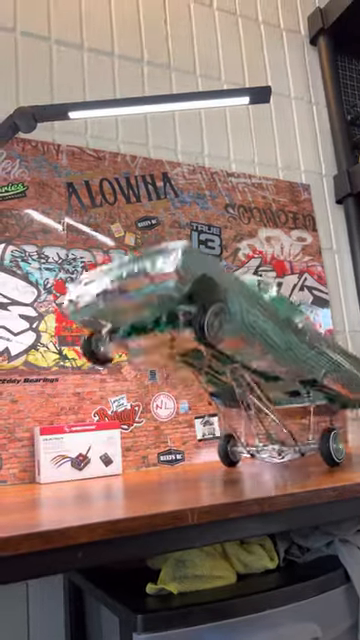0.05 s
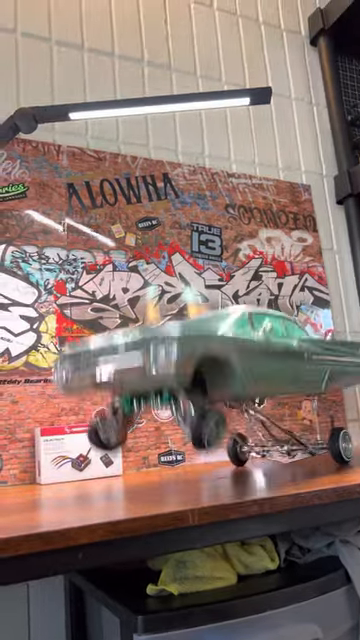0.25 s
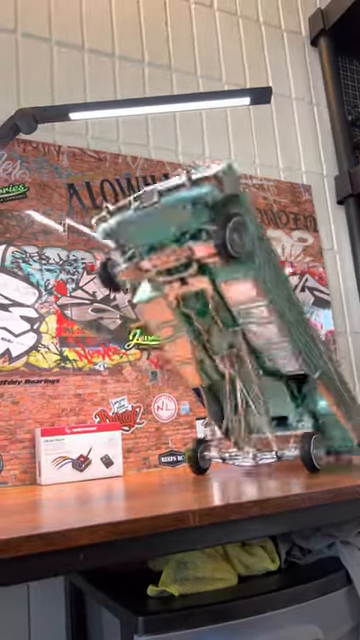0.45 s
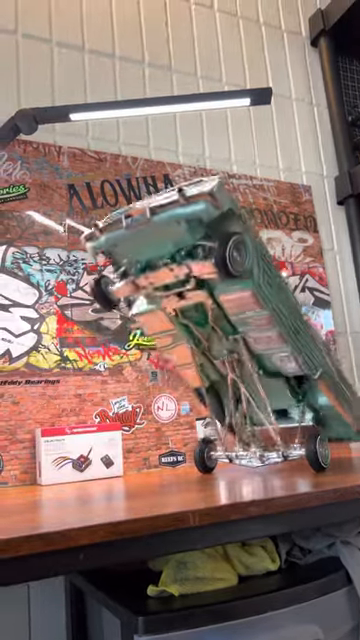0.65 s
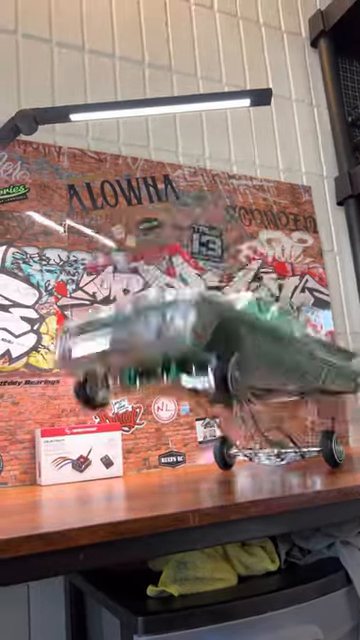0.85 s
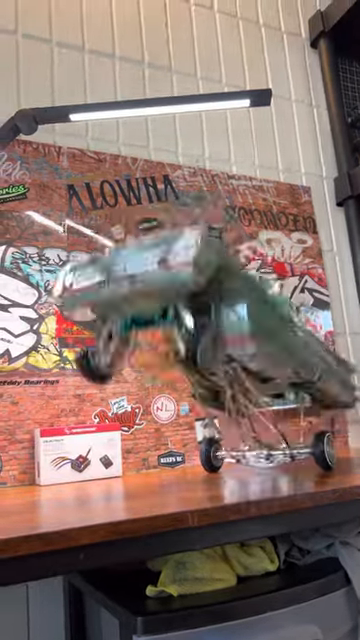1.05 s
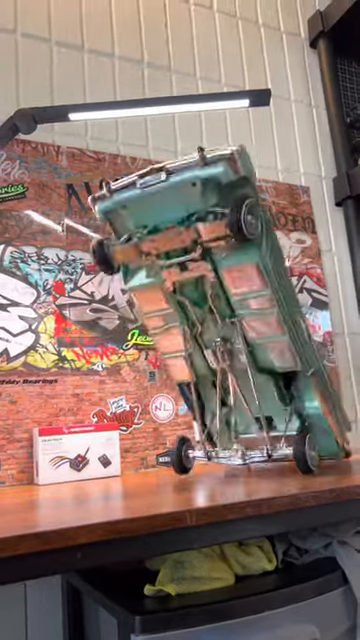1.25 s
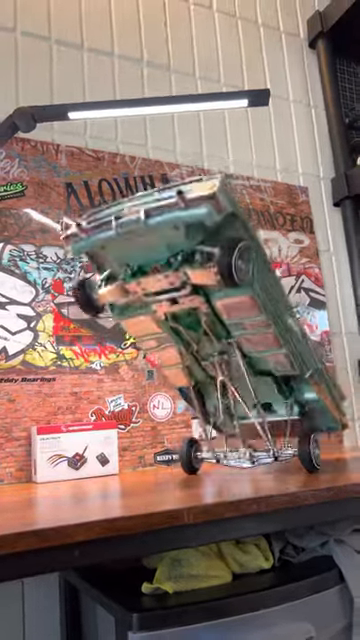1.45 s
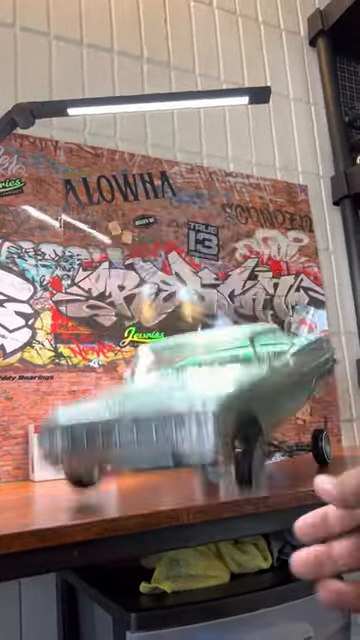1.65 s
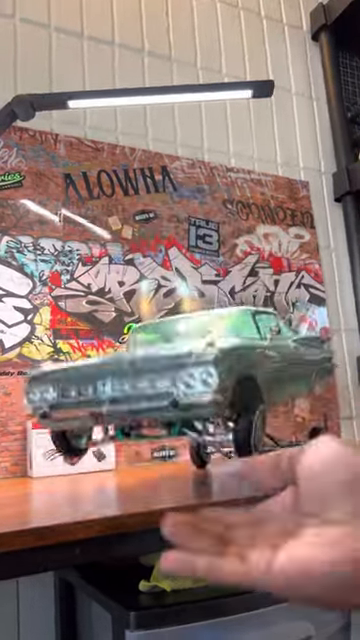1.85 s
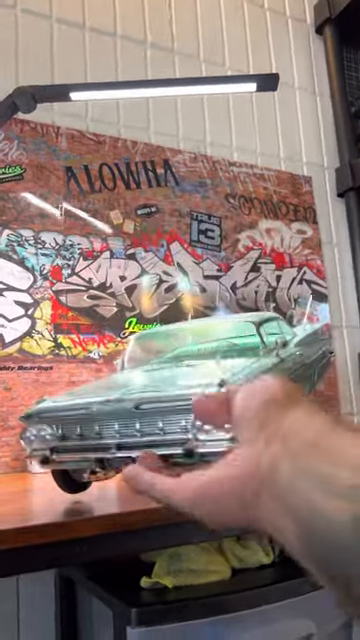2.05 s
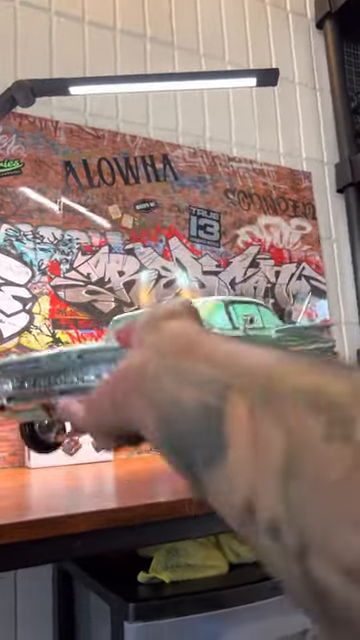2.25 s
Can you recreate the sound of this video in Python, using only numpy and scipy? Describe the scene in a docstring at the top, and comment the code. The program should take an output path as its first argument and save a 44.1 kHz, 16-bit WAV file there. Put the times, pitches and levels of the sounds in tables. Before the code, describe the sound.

Close by in a small, faintly humming room, a toy car thumps and clatters on a wooden bench. Two hops come with short gear rasps and high squeaks, light ticks between them, then a sharp drop and one last bounce.

```python
"""A radio-controlled model car hops on a wooden workbench in a small, humming workshop. First its linkage
creeps with faint ticks. Twice the front tyres land with a boom, the geared lift rasps, throws the nose up and
spins back with a squeak, and the tail clatters on the wood, each impact exciting the modes of shell, chassis
and bench. Then, near 1.7 s, a brief swell of noise leads into a drop with a thud; the car bounces once and
settles. A low handling bump comes last."""
import sys
import numpy as np
from scipy import signal
from scipy.fft import rfft, irfft
from scipy.io import wavfile
from scipy.ndimage import uniform_filter1d

SR = 44100
rng = np.random.default_rng(int(sys.argv[2]) if len(sys.argv) > 2 else 0)


def to_wav(s):
    """Save 16-bit WAV."""
    ch = np.atleast_2d(s).T  # columns
    pcm = np.round(np.clip(ch, -1, 1) * 32767)  # PCM
    wavfile.write(sys.argv[1], SR, pcm.astype(np.int16))


N = 101429
T = np.arange(SR // 2) / SR  # time axis of one event [s]


def amp(db):
    """Amplitude ratio of a level in decibels."""
    return 10 ** (np.asarray(db) / 20)


def unit(x):
    """Normalisation to rms 1."""
    return x / np.sqrt(np.mean(x ** 2) + 1e-20)


def read(points, hz):
    """Interpolation of a table on a logarithmic frequency axis."""
    f, value = np.transpose(points)
    return np.interp(np.log(hz + 1), np.log(f), value)


def add(mix, s, sound):
    """Superposition: a sound joins the mix at time s."""
    part = mix[:, round(s * SR):][:, :sound.shape[-1]]
    part += sound[..., :part.shape[1]]


# Likeness of the left and right channels: (frequency [Hz], coherence [0-1])
COHERENCE = [(120, .99), (300, 1), (600, 0.6), (1500, 0.33), (5000, 0.26), (12000, 0.96)]

def noise(colour, size=len(T)):
    """Random-phase synthesis: partly coherent stereo noise of rms 1, its spectrum colour(hz) in dB."""
    hz = np.fft.rfftfreq(size, 1 / SR)
    mid, side = np.exp(2j * np.pi * rng.random((2, len(hz))))
    coherence = np.clip(read(COHERENCE, hz), 0, 1)
    mid, side = mid * np.sqrt(1 + coherence), side * np.sqrt(1 - coherence)
    return unit(irfft(np.array([mid + side, mid - side]) * amp(colour(hz)), size))


# Spectrum of the air noise: (frequency [Hz], level [dB])
AIR_SPECTRUM = [(25, -29), (45, -3), (80, -7), (200, -5), (330, -11.5), (550, -13), (1000, -23),
                (2400, -26), (4200, -29.5), (5200, -37.5), (7500, -34.5), (16000, -59)]
# Partials of the hum: (frequency [Hz], level [dB])
HUM_PARTIALS = [(70, -47.5), (146, -49)]
# Envelope of air noise and hum together: (time [s], gain [dB])
BACKGROUND_ENVELOPE = [(0, 0.5), (1.63, 1), (2.05, 4), (2.22, -3.5)]

def workshop(air_db=-44.5):
    """Noise floor: broadband air noise and a low hum, slowly modulated in amplitude and phase."""
    t = np.arange(N) / SR
    waver = lambda: unit(sum(np.sin(2 * np.pi * (f * t + rng.random())) for f in np.geomspace(1, 9, 10)))
    hum = sum(amp(db) * (1 + 0.18 * waver()) * np.sin(2 * np.pi * hz * t + 0.9 * waver())
              for hz, db in HUM_PARTIALS)
    air = amp(air_db) * noise(lambda hz: read(AIR_SPECTRUM, hz), N)
    return (air + hum) * amp(np.interp(t, *np.transpose(BACKGROUND_ENVELOPE)))


CONTACT_RISE_S = 0.0014
# Linkage clicks and faint taps of the rear bumper on the bench: (time [s], level [dB])
LIGHT_TICKS = [(0.161, -32), (.550, -30), (0.692, -43), (0.886, -30.5), (1.314, -29), (1.392, -40)]
# Creep of the linkage while the nose is up: (start [s], end [s], tick level [dB])
LINKAGE_CREEPS = [(0.027, 0.156, -54.5), (0.724, 0.922, -52.5), (1.416, 1.649, -53.5)]
# Spectrum of a tick: (frequency [Hz], level [dB])
TICK_SPECTRUM = [(200, -30), (1500, 10), (4500, 3), (7000, 5), (9500, -6.5), (16000, -14)]

def light_ticks(decay_s=0.0036, creep_ticks_per_s=45, full_db=-27):
    """Brief contacts are broadband: linkage clicks, bumper taps and finer ticks as the linkage creeps."""
    out = np.zeros((2, N))
    click = (1 - np.exp(-T / CONTACT_RISE_S)) * np.exp(-T / decay_s)
    fine = [(s, db + 2 * rng.standard_normal()) for start, end, db in LINKAGE_CREEPS
            for s in rng.uniform(start, end, round((end - start) * creep_ticks_per_s))]
    for s, db in LIGHT_TICKS + fine:
        tilt_db = 0.5 * (full_db - db)  # weaker ticks are brighter
        burst = noise(lambda hz: read(TICK_SPECTRUM, hz) + tilt_db * np.log2(hz / 3500 + 1))
        add(out, s, 2 * amp(db) * click * burst)
    return out


def shell(spectrum, tilt_db, peak_hz=4200, peak_width_hz=250, peak_db=3):
    """Resonant filtering: the shell has one main peak, and ripples that vary with the contact point."""
    grid_hz = np.arange(0, SR / 2, 260)
    ripple_db = 3.2 * rng.standard_normal(len(grid_hz))

    def colour(hz):
        slope = tilt_db * np.log2(np.maximum(hz, 500) / 3500)
        peak = peak_db / (1 + (2 * (hz - peak_hz) / peak_width_hz) ** 2)
        return read(spectrum, hz) + slope + np.interp(hz, grid_hz, ripple_db) + peak
    return noise(colour)


def resonance(centre_hz, half_width_hz):
    """Random excitation of one resonance gives narrow-band noise."""
    return noise(lambda hz: -20 * np.log10(1 + ((hz - centre_hz) / half_width_hz) ** 2))


# Runs of the lift: (start [s], duration [s], level [dB], tilt [dB/octave], gearbox ring [dB])
GEAR_RUNS = [(0.174, 0.091, -25.5, -2, -39), (0.339, 0.045, -27, 0, -31),
             (0.916, 0.095, -25.5, -1.5, -35.5), (1.058, 0.045, -25, -1.5, -28)]
# Spectrum of the gear noise: (frequency [Hz], level [dB])
GEAR_SPECTRUM = [(100, -30), (500, 0), (1200, -1), (2500, 2.5), (4500, -1), (6500, 3), (9500, -4),
                 (12000, -0.5), (16000, -14)]

def lift_gears(teeth_per_s=660, rise_s=0.02, stop_s=0.029):
    """Gear-mesh noise: irregular tooth impacts modulate the rasp of the shell and the gearbox's ring."""
    out = np.zeros((2, N))
    for s, length, db, tilt_db, ring_db in GEAR_RUNS:
        impacts = rng.random(len(T)) < teeth_per_s / SR
        teeth = signal.lfilter([1], [1, -np.exp(-2 * teeth_per_s / SR)], impacts)
        envelope = np.minimum(T / rise_s, 1) ** 2 * np.exp(-np.maximum(T - length, 0) / stop_s)
        ring = amp(ring_db) * np.minimum(2 * T / length, 1) * resonance(2380, half_width_hz=110)
        rasp = amp(db) * shell(GEAR_SPECTRUM, tilt_db)
        add(out, s, envelope * unit(1 + teeth) * (rasp + ring))
    return out


def focus(hz, centre_hz, peak_db=8, width_octaves=0.39):
    """Modal coupling: each place on the bench favours one range of resonances (gain in dB)."""
    return peak_db * np.exp(-(np.log2((hz + 1) / centre_hz) / width_octaves) ** 2)


# Spectrum of a knock on the bench top: (frequency [Hz], level [dB])
WOOD_SPECTRUM = [(25, -39), (60, -21), (100, -6.5), (200, -8), (330, -3), (500, -9.5), (750, -17.5),
                 (1100, -38), (3000, -75)]

def wood(centre_hz):
    """Modal overlap: the dense low resonances of the bench top merge into noise."""
    return noise(lambda hz: read(WOOD_SPECTRUM, hz) + focus(hz, centre_hz))


# Modes of the bench: (frequency [Hz], level [dB], T60 [s])
BENCH_MODES = [(75, 3, .27), (128, 4, 0.099), (170, -2, 0.17), (207.4, 7, 0.21), (285.2, -1, 0.29),
               (316.2, -1.5, 0.26), (359.3, 3.5, 0.51), (399.5, 0, 0.1), (465.5, 4.5, 0.083),
               (510.4, 1.5, 0.12), (538.8, 3, 0.11), (592, -3.5, 0.21), (756, 1, 0.16)]

def bench(weights):
    """Modal superposition: the bench rings as a weighted sum of damped sinusoids."""
    hz, db, t60 = np.transpose(BENCH_MODES)[:, :, None]
    return -(weights[:, None] * amp(db - 60 * T / t60) * np.sin(2 * np.pi * hz * T)).sum(0)


# Modes of the metal chassis: (frequency [Hz], level [dB], T60 [s])
CHASSIS_MODES = [(1717, 4, 0.027), (2637, -8.5, 0.087), (3694, -24.5, 0.027), (4053, 4.5, 0.054),
                 (4396, 2.5, 0.033), (5250, -6, 0.054), (6330, 6.5, 0.014)]

def chassis(tilt_db, detune=0.037, scatter_db=5):
    """Free vibration: each contact loads the frame differently, so its modes shift at random."""
    hz, db, t60 = np.transpose(CHASSIS_MODES)[:, :, None]
    hz = hz * (1 + detune * rng.uniform(-0.925, 1, hz.shape))
    db = db + tilt_db * np.log2(hz / 3500) + scatter_db * rng.standard_normal(hz.shape)
    phase = 2 * np.pi * rng.random(hz.shape) + 0.5 * rng.standard_normal((2,) + hz.shape)
    return (amp(db - 60 * T / t60) * np.sin(2 * np.pi * hz * T + phase)).sum(1)


# Hard contacts: (time [s], clack level [dB], tilt [dB/octave], knock level [dB], knock centre [Hz])
HARD_CONTACTS = [(.192, -18.5, 3.5, -22.5, 495), (0.206, -23.5, -0.5, -13.5, 396),
                 (.228, -24, -1, -17, 420), (.247, -23, 0.5, -15.5, 368), (.270, -27.5, -4, -31, 303),
                 (.283, -23, -5, -18, 460), (.303, -34.5, 0, -25.5, 380), (.379, -22.5, -1, -31, 480),
                 (.400, -25, 0, -18, 355), (.467, -18.5, 1, -19, 565), (.488, -22.5, -1, -17, 517),
                 (.522, -18, -3, -20.5, 416), (.574, -30.5, 1, -25, 510), (.934, -19.5, 2.5, -21, 650),
                 (.950, -35, -5, -15, 456), (.988, -22, -3.5, -17.5, 330), (1.026, -27.5, -3, -20, 468),
                 (1.098, -21.5, 1, -29.5, 380), (1.118, -26, 0.5, -15.5, 360), (1.154, -38, -2, -26, 333),
                 (1.208, -17, 0.5, -19, 600), (1.234, -20.5, -1, -19.5, 480), (1.264, -17, -3, -21, 505),
                 (1.289, -33.5, 3, -20, 506), (1.673, -13, 3.5, -22.5, 540), (1.683, -11.5, -4, -13.5, 500),
                 (1.687, -20, -10, -10, 323), (1.729, -29.5, 4.5, -17.5, 366),
                 (1.932, -14.5, 0, -24.5, 520), (1.941, -24, -1.5, -13.5, 334),
                 (1.961, -20.5, -2, -15.5, 425), (1.987, -29, 1.5, -20.5, 426),
                 (2.028, -40.5, 1.5, -29, 350)]
# Spectrum of the struck shell: (frequency [Hz], level [dB])
CONTACT_SPECTRUM = [(100, -81), (400, 7.5), (800, 0.5), (1300, -1), (2500, 3), (5000, -2), (8000, -4.5),
                    (10000, -10.5), (13000, -10.5), (16000, -20)]

def clacks(crack_s=0.0039, rattle_s=0.041, knock_s=0.015, knock_rise_s=0.0025, highpass_hz=236):
    """Impact excitation: each contact rattles the shell, rings the chassis and knocks on the wood."""
    out = np.zeros((2, N))
    hz = np.transpose(BENCH_MODES)[0]
    clack_rise = 1 - np.exp(-T / CONTACT_RISE_S)
    knock_rise = 1 - np.exp(-T / knock_rise_s)
    shell_decay = np.exp(-T / crack_s) + amp(-15.5) * np.exp(-T / rattle_s)
    for s, db, tilt_db, knock_db, centre_hz in HARD_CONTACTS:
        strike = unit(amp(6.5 * rng.standard_normal(len(hz)) + focus(hz, centre_hz)))
        ring = amp(-7.5) / 2 * bench(strike * hz ** 2 / (hz ** 2 + highpass_hz ** 2))
        knock = amp(4.5) * wood(centre_hz) * np.exp(-T / knock_s) + ring
        clack = 2 * shell_decay * shell(CONTACT_SPECTRUM, tilt_db) + amp(-12) * chassis(tilt_db)
        add(out, s, amp(db) * clack_rise * clack + amp(knock_db) * knock_rise * knock)
    return out


# Wheels meeting the bench: (time [s], tyre level [dB], time to bottom out [s], thud level [dB])
TYRE_LANDINGS = [(.199, -8, 0.018, -12.5), (0.387, -39, 0.0068, -28), (.480, -18.5, 0.0048, -30),
                 (0.942, -5.5, 0.016, -14), (1.102, -35, 0.0075, -36), (1.214, -22.5, 0.0182, -30),
                 (1.680, -20.5, 0.02, -13), (1.942, -9.5, 0.00788, -15.5)]

def landings(tyre_hz=140.6, sag_hz=29.4, sag_s=0.012, rise_s=0.008, decay_s=0.0059, lowpass_hz=180):
    """Damped oscillation: tyres boom and sag in pitch; the springs bottom out and shake the bench."""
    out = np.zeros((2, N))
    hz = np.transpose(BENCH_MODES)[0]
    thud = bench(1 / (1 + (hz / lowpass_hz) ** 2)) * (1 - np.exp(-T / 0.0034))
    pitch = tyre_hz + sag_hz * np.exp(-T / sag_s)
    boom = np.minimum(T / rise_s, 1) * np.sin(2 * np.pi * np.cumsum(pitch) / SR)
    for s, tyre_db, squash_s, thud_db in TYRE_LANDINGS:
        after = np.maximum(T - squash_s, 0)
        contact_s = 5.8 * squash_s  # until the tyres lift off
        tail = amp(-12.5) * np.exp(-(after / contact_s) ** 4)
        add(out, s, -amp(tyre_db) * boom * (np.exp(-after / decay_s) + tail))
        add(out, s + squash_s, amp(thud_db) * thud)
    return out


# Squeaks of the lift: (time [s], level [dB])
LIFT_SQUEAKS = [(0.357, -23), (1.076, -24)]
# Partials of a squeak: (starting frequency [Hz], delay [s], level [dB])
SQUEAK_PARTIALS = [(14400, 0.0009, 3.5), (10390, .003, 2.5)]

def squeaks(length_s=0.017, fall_hz_per_s=70000, wobble_hz=330):
    """Frequency modulation: random wobble roughens two falling partials as the lift spins back."""
    out = np.zeros((2, N))
    arch = np.sin(np.pi * np.minimum(T / length_s, 1))
    for s, db in LIFT_SQUEAKS:
        for hz, delay, partial_db in SQUEAK_PARTIALS:
            wobble = unit(uniform_filter1d(rng.standard_normal((2, len(T))), size=28))
            pitch = hz - fall_hz_per_s * T + wobble_hz * wobble
            tone = np.sin(2 * np.pi * np.cumsum(pitch, axis=1) / SR)
            add(out, s + delay, amp(db + partial_db) * arch * tone)
    return out


# Faint rustles, then a handling bump: (time [s], duration [s], rustle level [dB], rumble level [dB])
RUSTLES_AND_BUMP = [(0.733, 0.028, -50.5, -49), (0.858, 0.06, -51, -48), (1.53, 0.046, -49.5, -62),
                    (2.175, 0.047, -51.5, -41)]

def rustles_and_bump():
    """Amplitude-shaped noise: faint rustles and whirrs, and a low handling bump at the end."""
    out = np.zeros((2, N))
    for s, length, rustle_db, rumble_db in RUSTLES_AND_BUMP:
        arch = np.sqrt(abs(np.sin(np.pi * np.minimum(T / length, 1))))
        rustle = shell(GEAR_SPECTRUM, tilt_db=-2.5)
        whirr = amp(-8.5) * resonance(3300, half_width_hz=360)
        rumble = wood(centre_hz=236)
        add(out, s, arch * (amp(rustle_db) * (rustle + whirr) + amp(rumble_db) * rumble))
    return out


# Short swells of noise before the last two landings: (time [s], level [dB])
LEAD_IN_SWELLS = [(1.662, -29.5), (1.918, -21.5)]

def lead_in_swells(swell_s=0.011):
    """Swelling noise: a short burst of shell noise swells up just before each of the last two landings."""
    out = np.zeros((2, N))
    swell = np.minimum(T / swell_s, 1) ** 2 * np.exp(-np.maximum(T / swell_s - 1, 0))
    for s, db in LEAD_IN_SWELLS:
        add(out, s, amp(db) * swell * shell(CONTACT_SPECTRUM, tilt_db=0))
    return out


# Reverberation time of the workshop: (frequency [Hz], T60 [s])
REVERB_TIMES = [(100, 0.48), (300, 0.36), (800, 0.4), (2000, 0.28), (5000, 0.32), (13000, 0.35)]
# Spectral weighting of the reverberation: (frequency [Hz], gain [dB])
REVERB_GAINS = [(70, -24), (150, -6), (350, -6), (1000, -3.5), (4000, -7.5), (13000, -15)]

def room(x, delay_s=0.00078, build_s=0.016):
    """Diffuse reverberation: dense reflections build up, then each band decays at its own rate."""
    hz, t, bands = signal.stft(noise(np.zeros_like), SR, nperseg=512)
    decay = amp(-60 * t / read(REVERB_TIMES, hz)[:, None])
    tail = signal.istft(bands * decay, SR, nperseg=512)[1][:, :len(T)]
    onset = np.clip((T - delay_s) / build_s, 0, 1)
    tail = unit(tail * onset) / np.sqrt(len(T))  # unit energy
    gain = amp(read(REVERB_GAINS, np.fft.rfftfreq(SR, 1 / SR)))
    response = irfft(rfft(tail, SR) * gain)[:, :len(T)]
    return signal.fftconvolve(x, response, axes=1)[:, :N]


# Balance of the microphone pair: (frequency [Hz], left minus right [dB])
STEREO_BALANCE = [(130, 0.5), (270, -3), (450, -3), (740, 3), (1220, .3)]

def scene(pair_delay_s=0.000021):
    """Time and level differences: car, room and background reach a close pair of microphones."""
    direct = clacks() + light_ticks() + landings() + lift_gears() + lead_in_swells() + rustles_and_bump()
    squeak = squeaks()
    background = workshop()
    reverberation = room(direct + amp(-8) * squeak)
    hz = np.fft.rfftfreq(N, 1 / SR)
    side = np.array([[0.5], [-0.5]])
    pair = amp(side * read(STEREO_BALANCE, hz)) * np.exp(-2j * np.pi * hz * side * pair_delay_s)
    return irfft(rfft(direct + squeak + reverberation + background) * pair, N)


def record(dry, cutoff_hz=15900):
    """Soft saturation rounds the peaks; a low-pass filter then limits the bandwidth."""
    limited = dry / (1 + dry ** 6) ** (1 / 6)
    lowpass = signal.firwin(511, cutoff_hz, window=("kaiser", 9), fs=SR)
    return signal.oaconvolve(limited, lowpass[None], "same")


dry = scene()
out = record(dry)
to_wav(out)
```